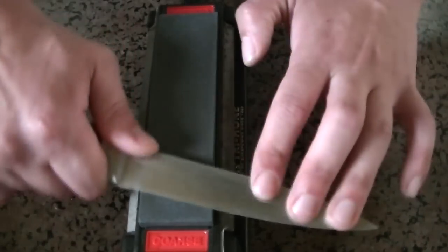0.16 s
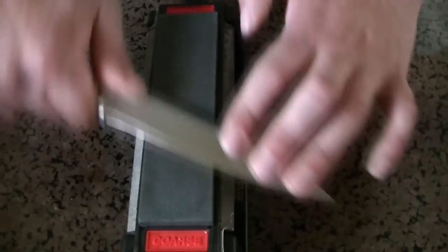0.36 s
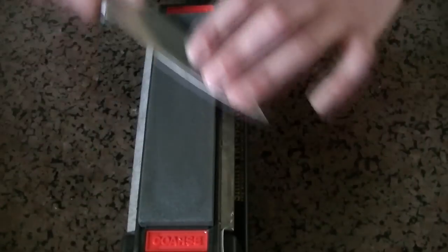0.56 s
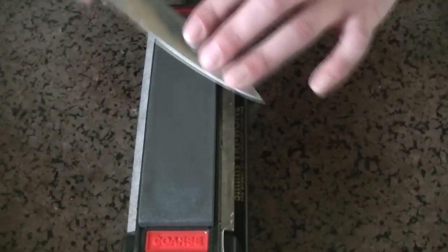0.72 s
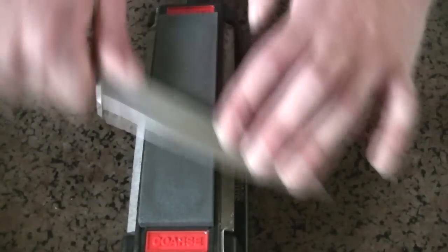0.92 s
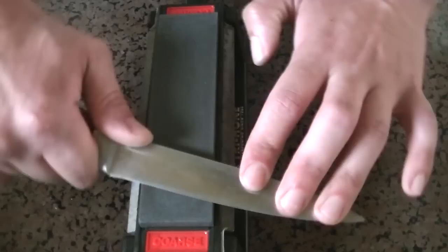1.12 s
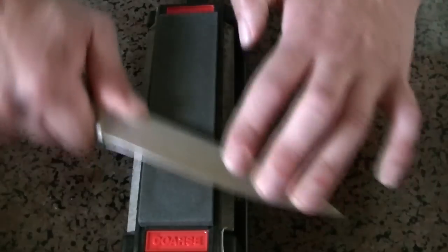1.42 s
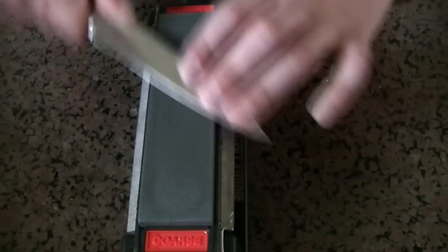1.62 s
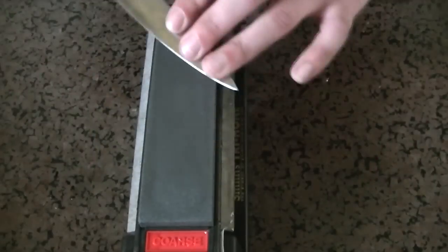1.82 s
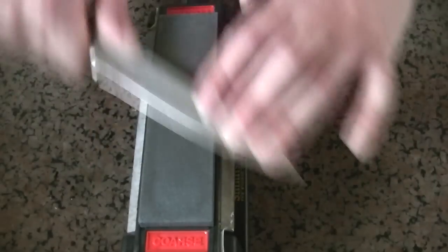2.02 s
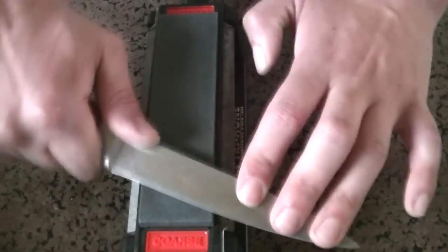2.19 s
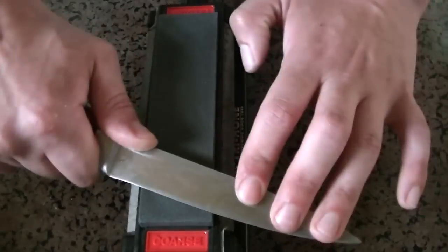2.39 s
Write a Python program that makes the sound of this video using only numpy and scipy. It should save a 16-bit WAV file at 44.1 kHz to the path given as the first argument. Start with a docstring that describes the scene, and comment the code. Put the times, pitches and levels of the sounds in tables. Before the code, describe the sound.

Gritty metallic rasping of a knife blade stroked to and fro along a coarse whetstone

```python
"""In a small room indoors, a steel knife is pushed and pulled along a coarse stone in its holder: four strokes
and the start of a fifth. Random grit ticks and rub excite the blade's modes and a broad hiss, a smoother rub the
stone's modes; contact place weights the modes. Where the edge snags on a larger grain, a short crackle and a
two-pitch ring sound. A decaying noise tail gives the room's reverberation, steady coloured noise its quiet air."""
import sys
import numpy as np
from scipy import signal
from scipy.io import wavfile
from scipy.ndimage import uniform_filter1d

SR = 44100
rng = np.random.default_rng(int(sys.argv[2]) if len(sys.argv) > 2 else 0)


def put_to_file(sound):
    """Save the sound as 16-bit audio at rate SR, in the file named by the first command-line argument."""
    columns = np.atleast_2d(sound).T  # one column per channel
    safe = np.clip(columns, -1, 1)
    whole_steps = np.round(safe * 32767)
    wavfile.write(sys.argv[1], SR, whole_steps.astype(np.int16))


N = 112454  # samples


def amp(db):
    """Level law: 20 dB is a tenfold amplitude."""
    return 10 ** (np.asarray(db) / 20)


def evened(x):
    """Normalisation to unit root-mean-square."""
    return x / np.sqrt(np.mean(x ** 2) + 1e-20)


def curve(rows):
    """Linear interpolation of a time table at every sample."""
    return np.interp(np.arange(N) / SR, *np.transpose(rows))


def read(points, hz):
    """Interpolation of a spectrum table along logarithmic frequency."""
    f, value = np.transpose(points)
    return np.interp(np.log(hz + 1), np.log(f + 1), value)


def colour(x, points):
    """Minimum-phase filtering: the log spectrum and the phase form a Hilbert pair, so the filter is causal."""
    hz = abs(np.fft.fftfreq(4096, 1 / SR))
    log_gain = np.log(amp(read(points, hz)))
    phase = -signal.hilbert(log_gain).imag
    taps = np.fft.ifft(np.exp(log_gain + 1j * phase)).real[:2048]
    return signal.oaconvolve(x, taps)[:N]


def uneven(seconds):
    """Smoothed noise: a random wobble of unit size that changes over the given time."""
    span = max(int(seconds * SR / 2), 1)
    once = uniform_filter1d(rng.standard_normal(N), span)
    return evened(uniform_filter1d(once, span))


def resonate(x, hz, width):
    """Heterodyne resonator: shift a mode to zero frequency, smooth, shift back; it may glide, peak gain 1."""
    turn = np.exp(2j * np.pi * np.cumsum(hz * np.ones(len(x))) / SR)
    r = np.exp(-np.pi * max(width, 10) / SR)
    smooth = signal.lfilter([1 - r], [1, -r], x / turn)
    return 2 * (turn * smooth).real


def patchy(x):
    """Time-frequency modulation: short-lived patches of the spectrum swell and sink at random."""
    patch_db = 2.5
    z = signal.stft(x, nperseg=256)[2]
    noise = rng.standard_normal(z.shape[::-1]).T
    patches = uniform_filter1d(uniform_filter1d(noise, size=4, axis=0), size=10, axis=1)
    return signal.istft(z * amp(patch_db * evened(patches)), nperseg=256)[1][:N]


def air():
    """Stationary noise: the steady background of the room has a fixed spectrum and level."""
    # Each row: frequency in Hz, relative spectral density in dB per Hz.
    air_spectrum = [(25, -50), (60, -23), (100, -10), (220, -11), (500, -4.5), (1200, -4), (2000, -8.5),
                    (5000, -23.5), (11000, -34)]
    level_db = -49
    return amp(level_db) * evened(colour(rng.standard_normal(N), air_spectrum))


def room(x):
    """Reverberation: convolution with a noise tail whose bands each decay exponentially at their own speed."""
    # Each row: frequency in Hz, time to decay by 60 dB in seconds.
    decay_times = [(1500, 0.29), (5000, 0.2), (14000, 0.03)]
    hz, t, z = signal.stft(rng.standard_normal(SR // 2), SR, nperseg=256)
    decay = amp(-60 * t / read(decay_times, hz)[:, None])
    tail = signal.istft(z * decay, SR, nperseg=256)[1]
    tail = np.r_[np.zeros(200), tail]  # delay in samples before the tail
    return signal.fftconvolve(x, tail / np.linalg.norm(tail))[:N]


def grit():
    """Shot noise: dense random ticks of uneven size over a smooth Gaussian rub."""
    grains_per_s, spread_db = 5500, 4
    rub_share = 0.65  # of the power
    size = amp(spread_db * np.minimum(rng.exponential(1, N), 6)) * rng.choice([-1., 1.], N)
    ticks = evened(size * (rng.random(N) < grains_per_s / SR))
    return np.sqrt(rub_share) * rng.standard_normal(N) + np.sqrt(1 - rub_share) * ticks


def snags():
    """Impulsive excitation: each snag is a band-limited noise burst and a brief decaying ring at two pitches."""
    # Each row: start in seconds, crackle level in dB before the band filter, first ring pitch in Hz,
    # level of that ring in dB above the crackle level, second ring pitch in Hz.
    snag_rows = [(0.189, -28, 8320, 3.5, 7100), (0.3446, -24.5, 3470, 11.5, 7300),
                 (.394, -23, 8630, 4, 6510), (0.4992, -5.5, 6010, -1.5, 8900), (0.567, -15, 7740, 5, 5100),
                 (.5774, -13, 7680, 1, 3440), (0.803, -17, 5400, 2, 2990), (0.8089, -11.5, 5740, 0.5, 2900),
                 (.8151, -15.5, 10420, 7.5, 5890), (0.8614, -11.5, 7550, 3, 4860),
                 (.9241, -20.5, 3720, 5, 6950), (1.3017, -35, 3680, -10, 8400),
                 (1.3573, -31, 8100, 2.5, 4100), (1.396, -23, 7070, 7.5, 8760),
                 (1.5146, -11.5, 8730, 3.5, 4080), (1.5843, -15, 3300, 1.5, 4560),
                 (1.608, -17, 7700, 7, 3220), (1.6202, -20, 7540, 9, 4820),
                 (1.6365, -13.5, 7660, 4.5, 3140), (1.7484, -15, 5900, 1, 4530),
                 (1.8921, -21, 4330, 3.5, 6520), (1.923, -22, 4810, 9, 5270),
                 (1.9667, -25.5, 4400, 16, 5100), (2.0497, -11.5, 10120, -6, 7750),
                 (2.0545, -15.5, 7500, 6.5, 3120), (2.1227, -12.5, 3730, 6, 3910),
                 (2.146, -18, 8840, 4, 3610), (2.5138, -24, 8840, -2, 3570)]
    peak_s, ring_s = 0.00073, 0.0022  # crackle's time to its peak, ring's decay time
    low_hz, top_hz, second_ring_db = 2130, 14100, -3.5
    t = np.arange(600) / SR
    crackles, rings = np.zeros(N + 600), np.zeros(N + 600)
    noises = rng.standard_normal((len(snag_rows), len(t)))
    for (s, db, hz, ring_db, second_hz), noise in zip(snag_rows, noises):
        here = slice(round(s * SR), round(s * SR) + len(t))
        shape = t / peak_s * np.exp(1 - t / peak_s)
        crackles[here] += amp(db) * shape * noise
        # two noise values serve as random phases
        first = np.sin(2 * np.pi * hz * t + noise[0])
        second = amp(second_ring_db) * np.sin(2 * np.pi * second_hz * t + noise[1])
        envelope = (1 - np.exp(-2 * t / peak_s)) * np.exp(-t / ring_s)
        rings[here] += amp(db + ring_db) * envelope * (first + second)
    band = signal.butter(2, [low_hz, top_hz], "band", fs=SR)
    return signal.lfilter(*band, crackles[:N]), rings[:N]


def hiss(drive):
    """Broadband radiation: the grit's noise between the modes, filtered to a smooth spectrum."""
    # Each row: frequency in Hz, gain in dB.
    hiss_spectrum = [(40, -46), (100, -25.5), (250, -28.5), (600, -23.5), (1400, -2), (2700, 0),
                     (5000, -0.5), (6600, -1), (9000, -1), (11000, -7), (13000, -10), (16000, -15.5)]
    return patchy(colour(drive, hiss_spectrum))


def stone(drive, place):
    """Modal synthesis: stone and holder modes ring by amounts that depend on the point of excitation."""
    # Each row: frequency in Hz, nominal width in Hz, then five gains in dB with the blade at each contact place.
    stone_modes = [(350.5, 60, 3, 2, -8, -6, 2.5), (569, 93, 0, 0, -7.5, -10.5, -5.5),
                   (776, 82, -1.5, 8, -6, -2, -11), (1000, 54.4, 16.5, 23.5, 13, 12.5, 5.5),
                   (1076, 66, 18, 23, 15, 17, 11), (1186.6, 65, 15, 20, -3, -5, -17),
                   (1700, 33.7, 10.5, 17, 22.5, 26, 13.5), (1704.3, 122, 10, 14, 18.5, 21, 8.5),
                   (1926, 74, 5.5, 16, 3.5, 15, 2.5), (2304, 98, -2, 7.5, 10, 11, 7.5)]
    # Contact places for those gains, from 0 at the near end to 1 at the far end.
    contact_places = [0, .36, .56, .76, 1]
    out = np.zeros(N)
    for k, (hz, width, *shape_db) in enumerate(stone_modes):
        force = drive * amp(np.interp(place, contact_places, shape_db))
        # alternate signs between neighbouring modes
        out += (-1) ** k * resonate(resonate(force, hz, 1.5 * width), hz, 1.5 * width)
    return out


def blade(drive, rings, place):
    """Modal synthesis: each blade mode rings best at one contact place, and its pitch shifts with the contact."""
    # Each row: frequency in Hz at the best place, nominal width in Hz, top gain in dB, place where it rings best
    # (0 near end to 1 far end), reach along the stone as a share of its length, gain in dB added
    # from late in the third stroke onward.
    blade_modes = [(2956, 40, 7.5, 0.69, 0.33, 3.5), (3182, 72, 15.5, 0.676, 0.044, 4),
                   (3630, 213, 8.5, 0.38, 0.29, -1.5), (4400, 210, 7.5, .86, .12, 6),
                   (4900, 103, 3.5, 0.76, 0.12, 3.5), (5200, 120, 9.5, 0.96, .13, 4.5),
                   (5710, 170, 8, 0.96, 0.15, 3), (5960, 230, 8, 0.53, 0.15, 3),
                   (7060, 225, 11, 0.24, .12, 0.5), (7820, 130, 10.5, 0.668, .07, 6.5),
                   (8600, 360, 4, 0.15, 0.56, -3.5), (8580, 380, 9.5, 0.46, 0.13, -1),
                   (8920, 210, 10, 0.874, 0.11, -9), (10190, 350, 3, 0.727, 0.22, 4.5),
                   (11840, 92, -11, 0.48, 0.066, -3)]
    late_s, fall_db = 1.7, -20  # gain far from the best place, relative to the top
    flicker_db, flicker_s, wander = 2, 0.057, 0.0084  # wander as a share of the pitch
    sag, low_hz = 0.036, 1130  # modes sag by this share over the stone's length
    out = np.copy(rings)
    late = np.arange(N) / SR > late_s
    for k, (hz, width, db, best, reach, late_db) in enumerate(blade_modes):
        near = np.exp(-.5 * ((place - best) / reach) ** 2)
        gain_db = db + late_db * late + fall_db * (1 - near) + flicker_db * uneven(flicker_s)
        pitch = hz * (1 + wander * uneven(2 * flicker_s)) * (1 + sag * (best - place))
        ringing = resonate(resonate(drive * amp(gain_db), pitch, 1.5 * width), pitch, 2 * width)
        out += (-1) ** k * ringing
    return signal.lfilter(*signal.butter(2, low_hz, "high", fs=SR), out)


def knife():
    """Friction excitation: separate grit noises drive blade and hiss, a smoother rub the stone, snags all three."""
    # Each row: time in seconds, scraping level in dB before the modes and filters.
    stroke_levels = [(0, -25), (.03, -44.5), (.08, -47.5), (.17, -57), (.2, -34.5), (.3, -27.5), (.36, -26),
                     (.43, -21), (.53, -24.5), (.66, -26), (.705, -42), (.75, -28), (.85, -27.5),
                     (.99, -19), (1.08, -28), (1.17, -41.5), (1.27, -61), (1.31, -41), (1.36, -39.5),
                     (1.4, -27), (1.48, -25.5), (1.62, -24.5), (1.75, -23), (1.8, -32), (1.85, -49),
                     (1.89, -33), (1.95, -25), (2.05, -23), (2.12, -28.5), (2.2, -27), (2.27, -38.5),
                     (2.38, -56.5), (2.44, -54.5), (2.5, -44), (2.52, -35.5), (2.55, -30.5)]
    # Each row: time in seconds, place of the blade from 0 at the near end to 1 at the far end.
    blade_places = [(0, 0.028), (.19, 0.018), (.49, 0.51), (.57, 0.73), (.7, 0.97), (.855, 0.71),
                    (.94, 0.49), (1.25, 0.017), (1.34, 0.068), (1.53, 0.33), (1.63, 0.747), (1.85, 0.95),
                    (2.052, 0.74), (2.125, 0.51), (2.35, 0.015), (2.55, 0.12)]
    judder_db, stone_judder_db, judder_s = 1.27, 1.84, 0.013
    snag_to_stone_db = -18
    place = np.clip(curve(blade_places), 0, 1)
    level = amp(curve(stroke_levels))
    crackles, rings = snags()
    press = level * amp(judder_db * uneven(judder_s))
    edge_drive = press * grit() + crackles
    hiss_drive = press * grit() + crackles
    stone_rub = level * amp(stone_judder_db * uneven(judder_s)) * rng.standard_normal(N)
    stone_drive = stone_rub + amp(snag_to_stone_db) * crackles
    return blade(edge_drive, rings, place) + hiss(hiss_drive) + stone(stone_drive, place)


def scene():
    """Superposition: direct sound, reverberation and air add linearly."""
    room_db = -12
    dry = knife()
    return (dry + amp(room_db) * room(dry) + air())[None]


def record(dry):
    """Band limitation: a linear-phase low-pass filter removes the top of the spectrum."""
    edge_hz = 15550
    taps = signal.firwin(511, edge_hz, window=("kaiser", 9), fs=SR)
    return signal.oaconvolve(dry, taps[None], "same")


dry = scene()
out = record(dry)
put_to_file(out)
```